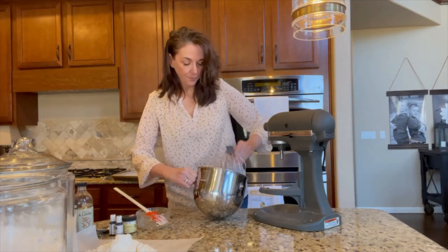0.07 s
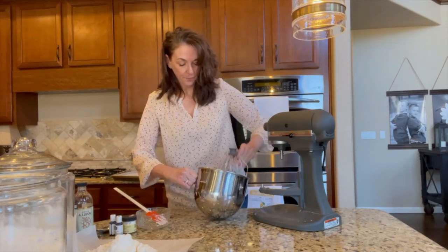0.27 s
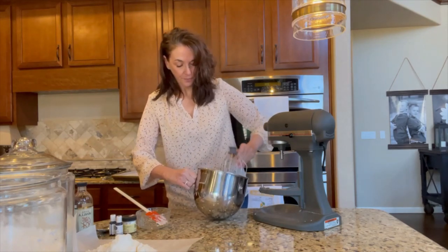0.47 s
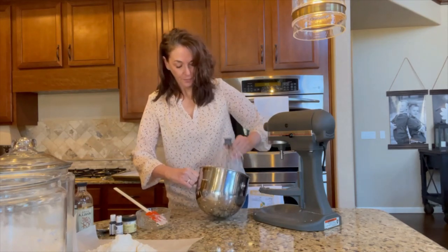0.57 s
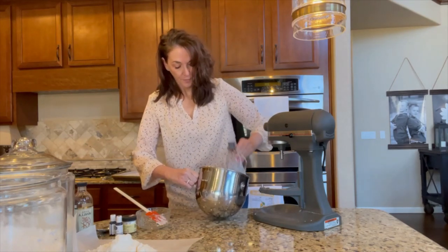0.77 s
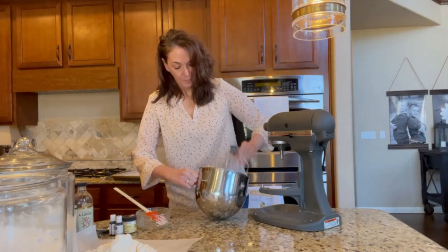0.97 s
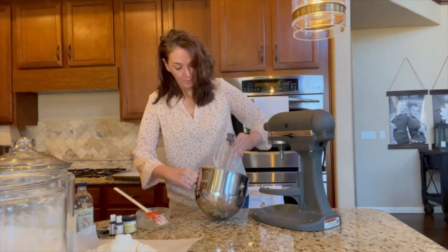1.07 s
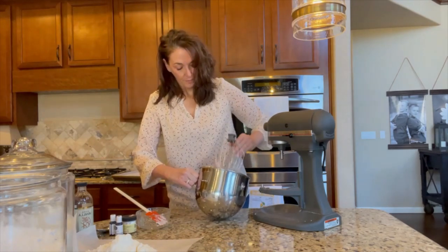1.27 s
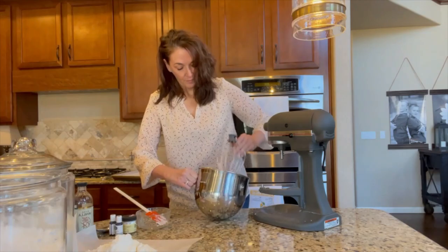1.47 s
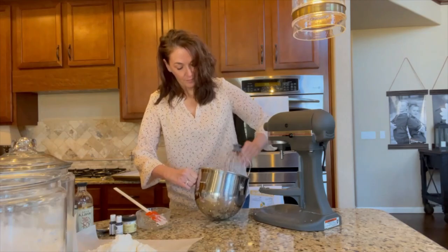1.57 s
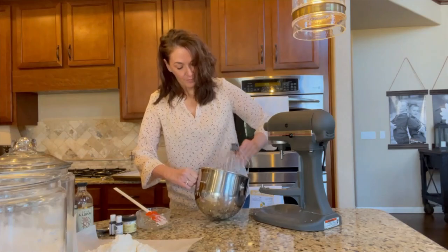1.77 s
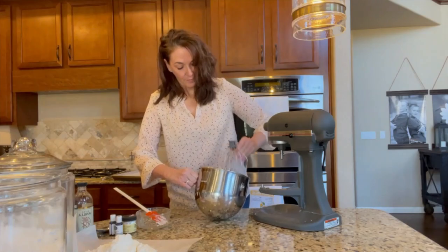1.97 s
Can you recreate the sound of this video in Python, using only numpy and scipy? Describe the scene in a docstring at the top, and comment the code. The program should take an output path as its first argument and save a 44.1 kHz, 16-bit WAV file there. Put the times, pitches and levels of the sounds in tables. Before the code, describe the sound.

Ten bright, rattly metal whisk taps against a hand-held steel mixing bowl, evenly paced, indoors

```python
"""Whisk on a steel bowl

Hard-walled kitchen, close pair of microphone ports: a wire whisk knocks ten times on a hand-held bowl's rim.
Several wires land within a few ms; each knock is shaped noise (snap) plus decaying sines (damped steel).
The bowl thuds on hand and counter in low decaying sines. Discrete early echoes, low standing waves and
a short tail of decaying noise answer from the room, over a quiet floor of low rumble and hiss."""
import sys
import numpy as np
from scipy import signal
from scipy.fft import rfft, irfft, next_fast_len
from scipy.io import wavfile

SR = 44100
rng = np.random.default_rng(int(sys.argv[2]) if len(sys.argv) > 2 else 0)


def inscribe(sig):
    """Save sig as 16-bit PCM at rate SR to the path in sys.argv[1].

    A 1-D sig is mono; a 2-D sig holds one channel per row.
    Samples are clipped to [-1, 1] before scaling.
    """
    pcm = np.round(np.clip(np.atleast_2d(sig).T, -1, 1) * 32767)
    wavfile.write(sys.argv[1], SR, pcm.astype(np.int16))


N = 88464

# Quiet kitchen floor: (frequency [Hz], relative density [dB])
FLOOR_SPECTRUM = [(15, -30), (30, -13.5), (40, -3), (50, 0.5), (62, -9.5), (80, -7), (120, -9), (300, -12),
                  (700, -30), (2000, -35), (5000, -28.5), (10000, -51), (16000, -72)]
# Room tail: (frequency [Hz], t60 [s], relative level [dB], left-right likeness [-1..1])
ROOM_TAIL = [(118, 0.39, -2, 0.29), (278, 0.3, 1.5, 0.49), (650, 0.44, -7.5, 0.033),
             (1840, 0.31, 2.5, 0.033), (4270, 0.48, -10.5, 0.017), (7850, 0.26, -7.5, 0.58),
             (11900, 0.29, -25, 0.6), (16200, 0.18, 6, 0.13)]
# Early echoes off hard surfaces: (delay [s], level [dB], left minus right [dB])
EARLY_ECHOES = [(.003, -12.5, 0.5), (.006, -14.5, -1.5), (0.0112, -20.5, 14), (0.018, -18, 16),
                (.023, -52, -56)]
# Standing waves of the room: (frequency [Hz], relative level [dB], t60 [s])
ROOM_MODES = [(147.5, -3.5, 0.35), (172.5, -5.5, 0.51), (198.5, 0.5, 0.28), (233, -7.5, 0.24),
              (299, -12, .4), (335, -14.5, 0.34), (408.2, 1.5, 0.29)]
# Rings of bowl and wires: (frequency [Hz], relative level [dB], t60 [s])
STEEL_MODES = [(1186, -24, 0.29), (1725, -1.5, 0.03), (2190, -9.5, 0.053), (2692, -5, 0.058),
               (2842, -5.5, 0.12), (3156, -9, .15), (3294, -20.5, 0.42), (3884, -0.5, 0.15),
               (4062, -9, 0.19), (4623, 5.5, 0.06), (4664, 9, 0.038), (5350, -5, .04), (5490, 6.5, 0.053),
               (6400, -5.5, 0.15), (6140, -14, 0.07), (7410, 17.5, 0.017), (7610, 9, 0.065),
               (8420, 11, 0.038), (7772, -3, 0.024), (8688, -9, 0.017), (12630, -7.5, 0.013),
               (15240, 15, 0.013)]
# Broad snap of the contacts: (frequency [Hz], relative density [dB])
SNAP_SPECTRUM = [(350, -38), (600, -14.5), (771, -10.5), (1520, -9.5), (1800, -17), (2450, -9), (2730, 0.5),
                 (3560, 2), (4770, 8.5), (5960, 5.5), (7870, 11.5), (10800, 10), (15100, -1.5),
                 (16000, -45), (16700, -33)]
# Knocks on the rim, levels relative: (time [s], knock level [dB], thud pitch [Hz], thud level [dB],
# boom level [dB], upper thud level [dB], boom tilt [dB/octave], brightness tilt [dB/octave],
# wires land over [ms], last wire against first [dB], rebound delay [ms], rebound level [dB],
# first graze level [dB], then six ring-group levels [dB]); the landing spot changes which groups sound
RIM_KNOCKS = [(0.018, -8, 325, -17.5, -32, -26, 0, -3.5, 6, 0, 15, -17, -16, -30.5, -34, -28.5, -17, -14.5, -24),
              (0.277, -10.5, 373, -14.5, -36, -20, -3, -3, 7, 0, 12.3, -24, -13, -27, -33, -27.5, -13.5, -13.5, -16.5),
              (0.4994, -8, 362, -15, -34.5, -19, -12, -2, 6, -12, 5.9, 0.5, -37, -24.5, -26.5, -23.5, -15, -16.5, -15),
              (0.7354, -8.5, 328, -11.5, -34, -22.5, -7.5, -3, 3.9, 16, 10.6, -12, -8.5, -26, -32.5, -20, -18, -14, -18),
              (0.9531, -7, 329, -14, -35, -24.5, -4.5, -2.5, 6, -17, 11, -9, -11, -25, -28, -19.5, -19.5, -13.5, -15.5),
              (1.1721, -6.5, 257, -20, -32, -25.5, -3.5, -2.5, 6.2, -8, 16, -32, -22, -27, -25, -29.5, -17.5, -12, -19),
              (1.3865, -8.5, 262, -12.5, -26, -23.5, -8, -1.5, 2.9, 12, 9.1, -16, -23, -19.5, -21.5, -28, -15.5, -9.5, -16),
              (1.5758, -6.5, 252, -12, -33.5, -24.5, -16, -2, 6, 8, 11.5, -39, -39, -20.5, -26.5, -28, -15.5, -12, -19),
              (1.7725, -7.5, 218, -21.5, -30.5, -26.5, -12, -2, 4.7, -1, 10.4, -8.5, -32, -24, -24, -24.5, -16.5, -13, -23),
              (1.948, -7.5, 312, -14, -34.5, -29, -3.5, -1, 7.95, 2, 14.8, -43, -16, -24.5, -24, -23.5, -18, -10.5, -23)]
# Phase between the two microphone ports: (frequency [Hz], left lead [rad])
MIC_PHASE = [(0, 0), (1640, 0.3), (2150, -0.0), (2840, 0.5), (3360, 1.6), (4650, 1.6), (4910, 0.2),
             (5340, 1.4), (7150, -0.0), (9130, -1.4), (10400, -2.9), (11900, -3.4), (14000, -6.2),
             (16400, -6.3)]
# Balance between the two microphone ports: (frequency [Hz], left minus right [dB])
MIC_BALANCE = [(60, 1.5), (110, 3.0), (200, 2.5), (380, 3.0), (700, 2.5), (1290, 1.5), (2380, 1.5),
               (4400, 1.0), (8120, 0.5), (15000, 0.0)]
# Ring groups picked out by the landing spot: centres [Hz] and widths [octaves]
RING_GROUPS_HZ = [1400, 2760, 3280, 3950, 4680, 5400]
GROUP_OCTAVES = [.5, .1, .08, .1, .07, .07]

FLOOR_DB, FLOOR_LIKENESS = -50, 0.66
TAIL_RISE_S = 0.004
GRAZE_S, LEAD_S = .004, 0.00099  # graze ahead of main run; start of main run ahead of the listed time
BOOM_DB, BOOM_RISE_S, BOOM_SCATTER_DB = 7.5, 0.0057, 2.5
THUD_LAG_S, THUD_RISE_S, THUD_T60_S, THUD_DB = 0.002563, 0.0042, 0.015, 10
UPPER_HZ, UPPER_T60_S, UPPER_DB = 513.8, 0.043, 6.5
WIRES, WIRE_SCATTER_DB, CLATTER_DB = 5, 2.5, -15.5
RING_RISE_S, RING_DB, MODE_SCATTER_DB = 0.0038, -3.5, 1.5
SNAP_RISE_S, SNAP_T60_S, SNAP_DB = 0.0005, .013, 15.5
SNAP_TO_ROOM_DB, THUD_TO_ROOM_DB = -7, 1.5
CUTOFF_HZ = 16800


def amp(db):
    """dB to gain."""
    return 10 ** (np.asarray(db) / 20)


def at_hz(points, hz, column=1):
    """Read a table on a log-frequency axis."""
    p = np.array(points, float)
    return np.interp(np.log(hz + 1), np.log(p[:, 0] + 1), p[:, column])


def shaped(x, response):
    """Multiply the spectrum by response(hz)."""
    n = x.shape[-1]
    return irfft(rfft(x) * response(np.fft.rfftfreq(n, 1 / SR)), n)


def stereo(mid, side, alike):
    """Two noises mixed to left and right with a given likeness."""
    return np.sqrt(1 + alike) * mid + np.sqrt(1 - alike) * side * [[1], [-1]]


def ringing(modes, offsets_db):
    """Sum of decaying sines, one for each resonance."""
    t = np.arange(SR // 2) / SR
    total = 0
    for (hz, db, t60), offset_db in zip(modes, offsets_db):
        decay = amp(db + offset_db - 60 * t / max(t60, .005))
        total = total + decay * np.sin(2 * np.pi * hz * t)
    return total


def floor():
    """Low rumble and hiss of the house: steady noise, partly alike on left and right."""
    white = rng.standard_normal((2, N))
    mid, side = shaped(white, lambda hz: amp(at_hz(FLOOR_SPECTRUM, hz)))
    return amp(FLOOR_DB) * stereo(mid, side, FLOOR_LIKENESS) / mid.std() / np.sqrt(2)


def tail():
    """Stereo response of the room's tail, noise dying band by band, drawn afresh for each knock."""
    t = np.arange(SR // 2) / SR
    hz = np.fft.rfftfreq(len(t), 1 / SR)
    response, white = 0, rfft(rng.standard_normal((2, len(t))))
    for centre in 90 * 2 ** np.arange(0, 8, .5):  # half-octave steps, overlapping bands
        band = np.cos(np.pi * np.clip(np.log2(hz / centre + 1e-9), -.5, .5)) ** 2
        mid, side = irfft(white * band, len(t))
        t60, db, alike = (at_hz(ROOM_TAIL, centre, column=c) for c in (1, 2, 3))
        rise = 1 - np.exp(-t / TAIL_RISE_S)
        fall = amp(db - 60 * t / t60) * np.sqrt(7 / t60 / SR)  # a longer decay starts lower
        response = response + rise * fall * stereo(mid, side, np.clip(alike, -1, 1))
    return response


def kitchen(direct, to_tail):
    """Direct sound with early echoes off the hard room, plus the diffuse tail."""
    early = np.zeros((2, SR // 2))
    early[:, 0] = 1
    for late, db, pan_db in EARLY_ECHOES:
        early[:, int(late * SR)] += amp(db + np.array([.5, -.5]) * pan_db)
    near = signal.fftconvolve(direct[None], early, axes=1)
    return near + signal.fftconvolve(to_tail[None], tail(), axes=1)


def time_after_push():
    """Seconds since the bowl began to push, zero before."""
    return np.maximum(np.arange(SR // 2) / SR - THUD_LAG_S - GRAZE_S, 0)


def boom(knock):
    """Low standing waves of the room, swelling after the bowl's push and ringing down."""
    knock_db, boom_db, tilt_db = knock[1], knock[4], knock[6]
    lean_db = tilt_db * np.log2(np.array(ROOM_MODES)[:, 0] / 200)
    lean_db = lean_db + BOOM_SCATTER_DB * rng.standard_normal(len(ROOM_MODES))
    waves = np.roll(ringing(ROOM_MODES, lean_db), int(GRAZE_S * SR))
    swell = 1 - np.exp(-(time_after_push() / BOOM_RISE_S) ** 2)
    return amp(knock_db + boom_db + BOOM_DB) * waves * swell


def thud(knock):
    """The bowl is pushed against hand and counter: a few low swings with a higher partner."""
    knock_db, hz, thud_db, upper_db = knock[1], knock[2], knock[3], knock[5]
    t = time_after_push()
    rise = 1 - np.exp(-(t / THUD_RISE_S) ** 2)
    after = np.maximum(t - THUD_RISE_S, 0)
    low = -amp(thud_db + THUD_DB - 60 * after / THUD_T60_S) * np.sin(2 * np.pi * hz * t)
    upper = amp(upper_db + UPPER_DB - 60 * after / UPPER_T60_S) * np.sin(2 * np.pi * UPPER_HZ * t)
    return amp(knock_db) * rise * (low + upper)


def landing_spot_db(hz, tilt_db, groups_db):
    """Colour of the landing spot: a brightness tilt and lifts or dips of the ring groups."""
    colour_db = tilt_db * np.log2(hz / 5000 + .01)
    lifts_db = groups_db - np.mean(RIM_KNOCKS, 0)[-len(groups_db):]  # against the average knock
    for lift_db, centre, width in zip(lifts_db, RING_GROUPS_HZ, GROUP_OCTAVES):
        colour_db = colour_db + lift_db * np.exp(-(np.log2(hz / centre + 0.03) / width) ** 2)
    return colour_db


def wire_contacts(spread_ms, fade_db, rebound_ms, rebound_db, graze_db):
    """Impulses of the wires landing one after another, in a graze, a main run and a rebound."""
    scatter_db = WIRE_SCATTER_DB * rng.standard_normal(WIRES)
    share = (np.arange(WIRES) + rng.random(WIRES)) / WIRES  # place of each wire within the run
    hits = np.zeros(SR // 20)
    main_ms = GRAZE_S * 1000
    for late_ms, level_db in ((0, graze_db), (main_ms, 0), (main_ms + rebound_ms, rebound_db)):
        places = ((share * abs(spread_ms) + late_ms) * SR / 1000).astype(int)
        np.add.at(hits, places, amp(scatter_db + fade_db * share + level_db))
    return hits / np.linalg.norm(hits)


def clatter(knock):
    """Wire contacts snap as noise and ring the steel; also gives one clean contact for the tail."""
    tilt_db, spread_ms, fade_db, rebound_ms, rebound_db, graze_db, *groups_db = knock[7:]
    t = np.arange(SR // 2) / SR
    level = amp(knock[1] + CLATTER_DB)

    def snap_colour(hz):
        """Snap spectrum as heard from this landing spot."""
        return amp(at_hz(SNAP_SPECTRUM, hz) + SNAP_DB + landing_spot_db(hz, tilt_db, groups_db))

    spot_db = landing_spot_db(np.array(STEEL_MODES)[:, 0], tilt_db, groups_db)
    rings = ringing(STEEL_MODES, MODE_SCATTER_DB * rng.standard_normal(len(STEEL_MODES)) + spot_db)
    rings = rings * amp(RING_DB) * (1 - np.exp(-t / RING_RISE_S))
    rings = np.roll(rings, int(GRAZE_S * SR))
    rebound_rings = amp(rebound_db) * np.roll(rings, int(rebound_ms * SR / 1000))

    hits = wire_contacts(spread_ms, fade_db, rebound_ms, rebound_db, graze_db)
    burst = (1 - np.exp(-t / SNAP_RISE_S)) ** 2 * amp(-120 * t / SNAP_T60_S)  # energy of one contact
    energy = signal.fftconvolve(hits ** 2, burst)[:len(t)]
    snap = shaped(rng.standard_normal(len(t)), snap_colour) * np.sqrt(np.abs(energy))

    click = shaped(signal.unit_impulse(len(t), int((LEAD_S + GRAZE_S) * SR)), snap_colour)
    click = click * amp(SNAP_TO_ROOM_DB) * np.sqrt(SNAP_T60_S * SR)
    return level * (snap + rings + rebound_rings), level * (click + rings)


def scene():
    """Ten knocks in the kitchen over its quiet floor."""
    out = floor()
    for knock in RIM_KNOCKS:
        wires, contact = clatter(knock)
        push, waves = thud(knock), boom(knock)
        room = kitchen(wires + push, contact + amp(THUD_TO_ROOM_DB) * push)
        sound = room[:, :len(waves)] + waves
        start = int((knock[0] - LEAD_S - GRAZE_S) * SR)
        out[:, start:start + len(waves)] += sound[:, :N - start]
    return out


def record(dry):
    """Two close microphone ports differ in level and phase; a steep low-pass cuts the top."""
    half = np.array([[.5], [-.5]])  # each port takes half the difference
    padded = np.pad(dry, ((0, 0), (0, next_fast_len(N + 2000) - N)))  # silence against wrap-around

    def port_response(hz):
        """Level and phase of the left and right port."""
        return amp(half * at_hz(MIC_BALANCE, hz)) * np.exp(1j * half * at_hz(MIC_PHASE, hz))

    ports = shaped(padded, port_response)[:, :N]
    low_pass = signal.cheby2(12, 70, CUTOFF_HZ, fs=SR, output="sos")  # 70 dB down from the cutoff up
    return signal.sosfilt(low_pass, ports)


dry = scene()
out = record(dry)
inscribe(out)
```